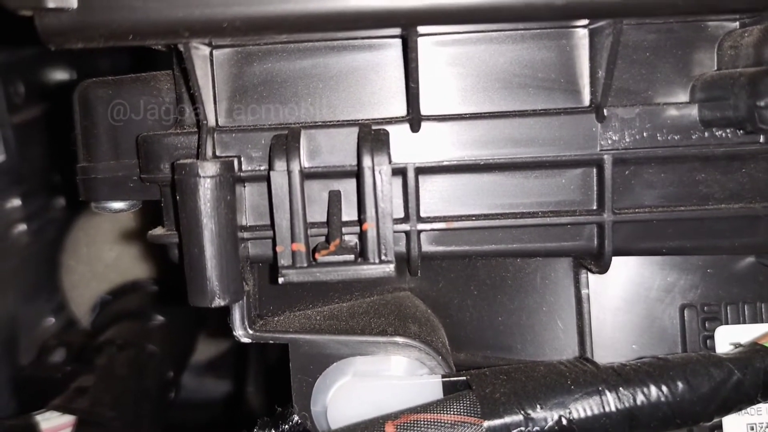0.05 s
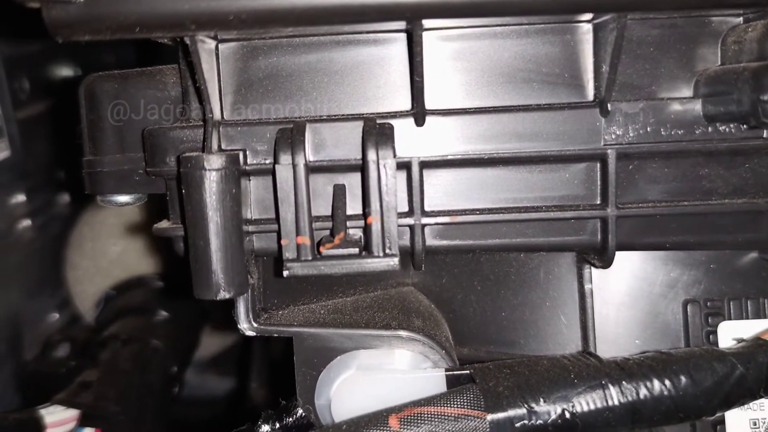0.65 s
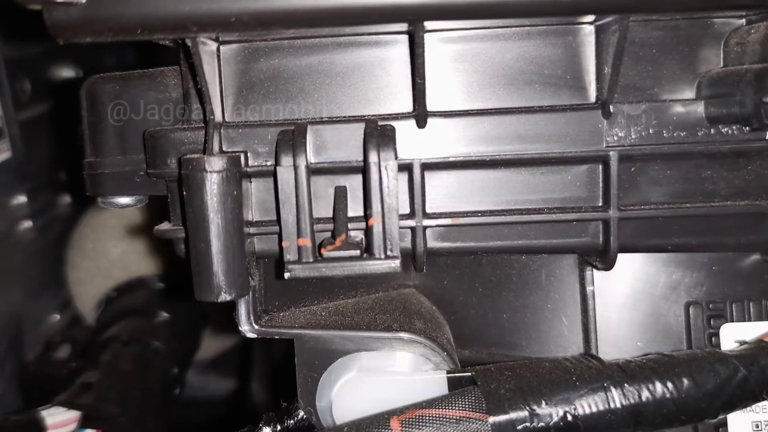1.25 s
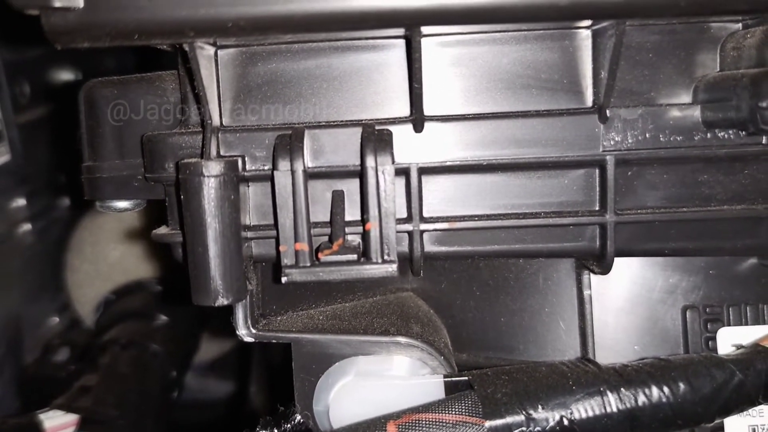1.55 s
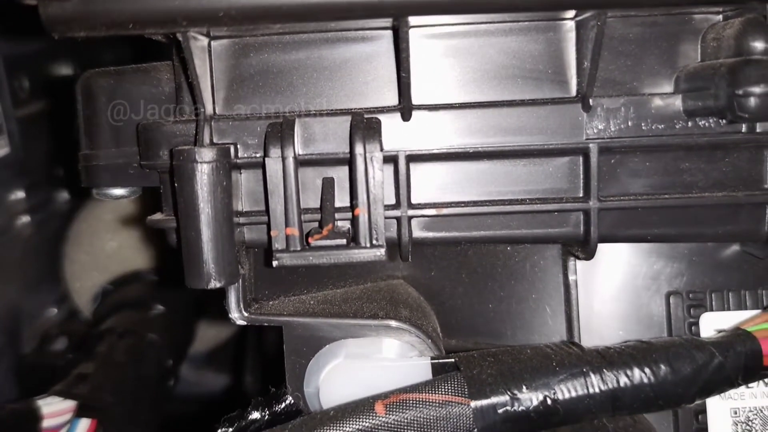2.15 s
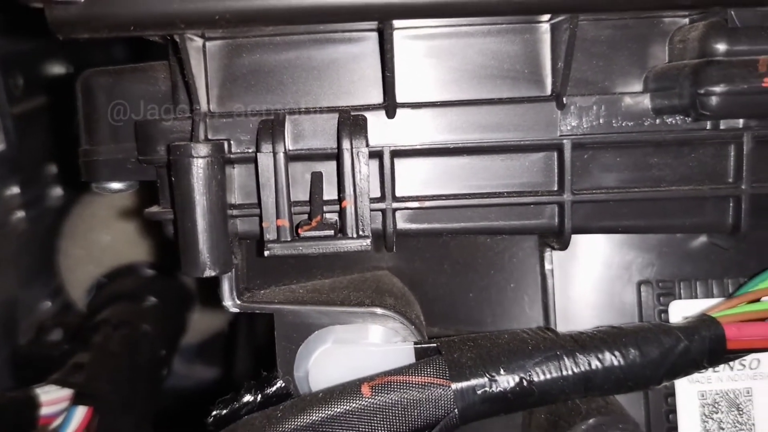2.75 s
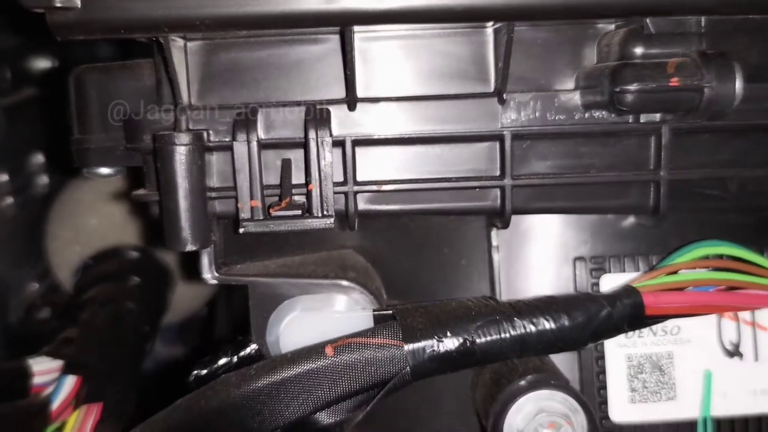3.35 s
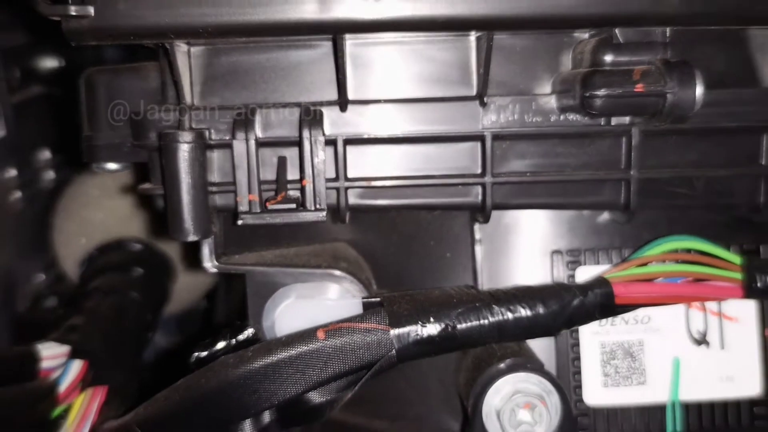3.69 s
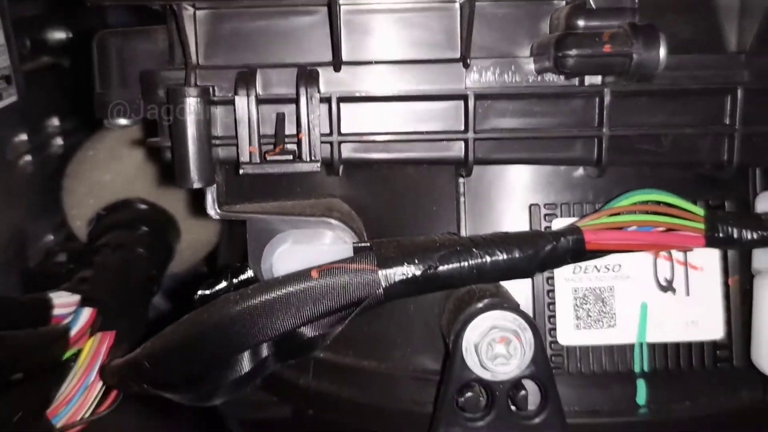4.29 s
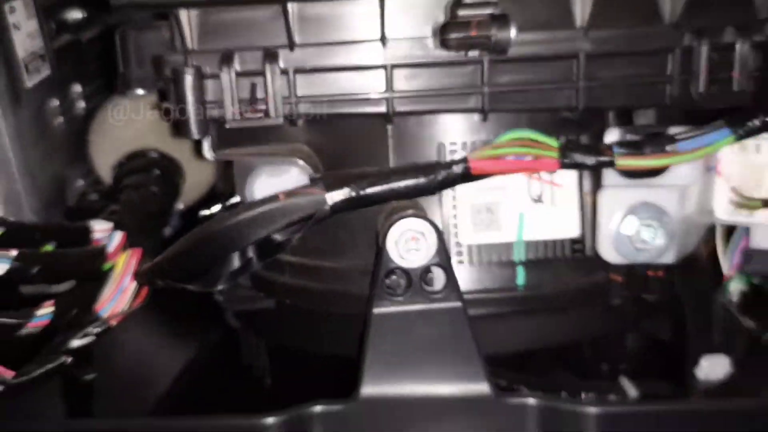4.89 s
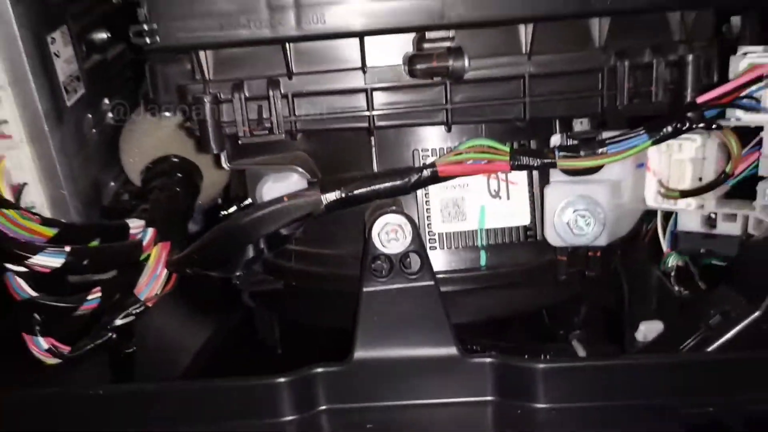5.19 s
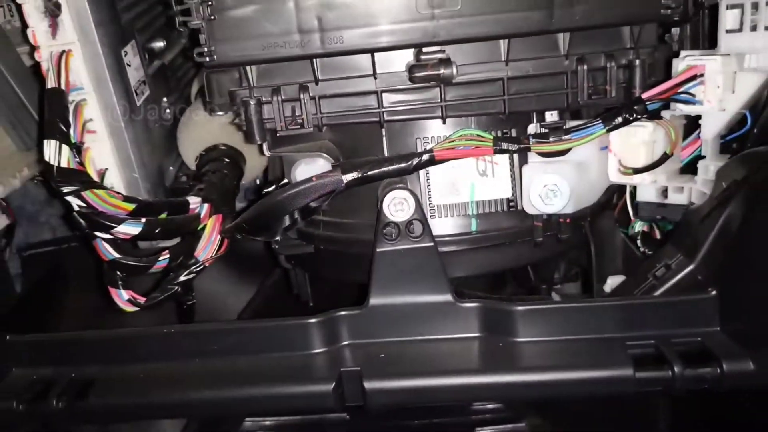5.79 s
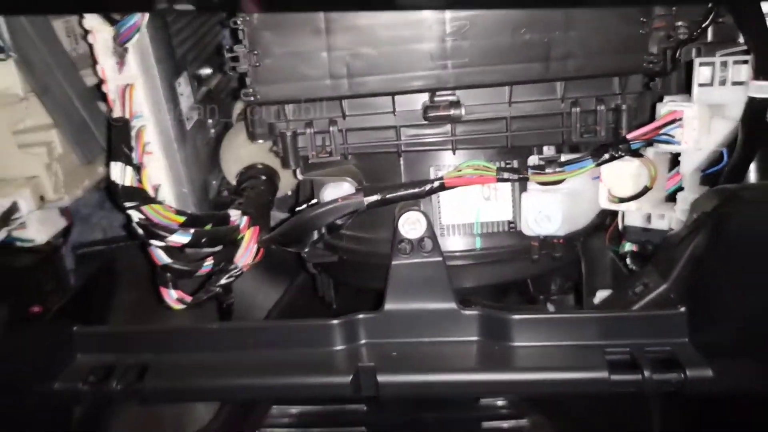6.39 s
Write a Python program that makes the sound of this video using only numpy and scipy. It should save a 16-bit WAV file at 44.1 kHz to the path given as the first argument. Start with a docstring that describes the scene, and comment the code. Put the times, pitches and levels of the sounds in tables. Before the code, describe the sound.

Inside a car, a small blower fan runs slowly behind the dashboard for the whole six and a half seconds. It makes a soft, steady whir of air through a plastic housing, with a thin, fluttering high hiss from its motor. Underneath, the idling engine gives a low, slightly throbbing hum. The hand-held microphone is close to the housing for the first three seconds, then gradually backs away, so the whir and hum become a little quieter. Around 3.8 seconds come two faint ticks, followed by a soft rub, two tiny plastic squeaks and another tick at about 4 seconds. A brief scuff of the hand passes at 4.7 seconds. At about 5.1 seconds there is one clear, sharp plastic click with a short rub just after it. The fan and engine then continue evenly to the end.

```python
"""A soft, steady whir of air with a thin, fluttering hiss, over the low hum of an idling car engine.
The heater fan runs slowly behind the open glove box, pushing air through its plastic housing.
The hiss comes from the brushes rubbing inside the fan's motor. The hand-held microphone starts
close to the housing, then backs away with a few rubs, faint squeaks and ticks, and one clear click."""
import sys
import numpy as np
from scipy import signal
from scipy.fft import rfft, irfft, next_fast_len
from scipy.io import wavfile
from scipy.ndimage import uniform_filter1d

SR = 44100
rng = np.random.default_rng(int(sys.argv[2]) if len(sys.argv) > 2 else 0)


def bounce(signal):
    """Save signal as a 16-bit WAV file at the path given by the first command-line argument."""
    frames = np.transpose(np.atleast_2d(signal))
    limited = np.clip(frames, -1, 1)
    pcm = np.round(limited * 32767).astype(np.int16)
    wavfile.write(sys.argv[1], SR, pcm)


N = 283991
T = np.arange(N) / SR
HZ = np.fft.rfftfreq(N, 1 / SR)
CRANK_HZ = 14.205  # turns of the engine's crankshaft per second

# the microphone's path: (time [s], distance [0 at the housing, 1 down by the feet])
MIC_DISTANCE = [(0, 0.039), (2.5, 0.0027), (3.6, 0.12), (4.4, 0.26), (5.0, .55), (5.5, 0.83), (6.44, 1)]


def fan(crank_turns):
    """Swirling air whirs and booms, throbbing as the engine shakes; turning parts add wavering tones."""
    # air rushing through the housing, close up and far away: (frequency [Hz], relative level [dB])
    rush_close = [(160, -25), (270, -5.5), (335, -3), (495, -1), (596, -2), (680, -10), (770, -10.5),
                  (890, -2.5), (1090, -15), (1250, -17.5), (1530, -15), (1850, -21.5), (2080, -33),
                  (3250, -60)]
    rush_far = [(160, -27.5), (270, 1.5), (360, 1), (440, -6), (580, 2), (750, -5.5), (980, -7),
                (1280, -14), (1440, -7), (1700, -25), (2050, -19), (2400, -43.5), (3250, -77)]
    # ringing of the housing: (frequency [Hz], width [Hz], level close [dB], level far [dB])
    housing_rings = [(515, 75, -50.5, -62), (848, 90, -54.5, -73.5), (1167, 23, -62.5, -64.5),
                     (1464, 110, -55, -63), (1752, 150, -61, -77.5), (2070, 110, -77, -67)]
    # boom of the air box and cabin: (frequency [Hz], relative level [dB])
    boom_spectrum = [(10, -24.5), (28, -13), (40, -22.5), (55, -11), (85, -0.5), (120, -1), (150, -3.5),
                     (180, -0.5), (230, -1.5), (290, -9), (400, -32.5), (700, -73.5)]
    # tones of the fan and other turning parts: (frequency [Hz], level close [dB], level far [dB])
    fan_tones = [(46.3, -56.5, -55), (49.6, -54.5, -56.5), (90, -48.5, -64.5), (118, -44, -60),
                 (181.1, -44, -49), (222.7, -50.5, -55.5), (230, -53, -50.5), (387.3, -61, -68.5),
                 (571.5, -60, -64), (784, -57.5, -61.5), (1160, -71.5, -66.5)]
    distance = curve(MIC_DISTANCE)
    rush = np.sqrt(1 - distance) * noise(colour(rush_close))
    rush += np.sqrt(distance) * noise(colour(rush_far))
    whir = patchy(rush * mic_gain(-40.5, -47) + ringing(housing_rings), depth_db=1.5)
    boom = noise(colour(boom_spectrum)) * mic_gain(-37, -42)
    throb = gain_of(0.42 * np.cos(2 * np.pi * crank_turns) + 0.5 * drift(7.3))
    tones = np.zeros(N)
    for hz, close_db, far_db in fan_tones:
        phase = 2 * np.pi * (hz * T + rng.random()) + 0.4 * drift(1.1)
        tones += mic_gain(close_db, far_db) * np.cos(phase)
    return (whir + boom) * throb + np.sqrt(2) * tones


def motor():
    """Brushes hiss on spinning contacts and ring the shell; a whine flutters as their touch varies."""
    # hiss of the brushes: (frequency [Hz], relative level [dB])
    hiss_spectrum = [(1500, -24), (2300, -2.5), (3000, -8.5), (3800, -7.5), (5100, -6.5), (5700, -11.5),
                     (6300, -11.5), (6900, -3.5), (7400, -7.5), (7800, -12), (8400, -11.5)]
    # ringing of the shell: (frequency [Hz], width [Hz], relative level close [dB], the same far [dB])
    shell_rings = [(3000, 70, -19, -25), (3265, 77, -19, -25), (5590, 150, -12.5, -15.5),
                   (6010, 120, -8, -10), (6273, 130, -3, -13), (6606, 96, -7.5, -8), (6750, 120, -20.5, -6),
                   (7090, 90, -13.5, -15.5), (7670, 100, -12.5, -24.5)]
    # whine of the motor: (frequency [Hz], width [Hz], level close [dB], level far [dB])
    whine_bands = [(4467, 37, -68.5, -77.5), (4630, 70, -73.5, -87)]
    brushes = noise(colour(hiss_spectrum)) * mic_gain(-2, -1.5)
    hiss = patchy(brushes + ringing(shell_rings), depth_db=3.3)
    flutter_hz = 18.2
    flutter_db = 3 * np.sin(2 * np.pi * flutter_hz * T + 0.5 * drift(2)) + 0.8 * drift(12)
    whine = dash_echo(ringing(whine_bands), share=0.33) * evened(gain_of(flutter_db))
    hiss = dash_echo(hiss, share=0.18) * mic_gain(-63, -65.5)
    # the hiss leaves the motor in a beam, which the microphone crosses at 3.2 s
    beam_db = 1.5 * np.exp(-((T - 3.2) / 0.79) ** 2)
    return hiss * gain_of(beam_db + 0.87 * drift(41)) + whine


def engine(crank_turns):
    """Two firings per turn push the cabin air into a hum; the valves' clatter repeats every two turns."""
    # tones of the hum: (frequency [multiple of the crank speed], level close [dB], level far [dB])
    hum_tones = [(1, -59.5, -66.5), (2, -47, -46.5), (3, -65, -64.5), (4, -36, -50.5), (5, -65, -63),
                 (6, -32, -41), (8, -45, -44.5), (10, -45.5, -49), (12, -46, -51), (14, -44.5, -50),
                 (16, -55, -58), (18, -57, -54.5), (20, -65.5, -53.5), (26, -55, -59.5)]
    # valve clatter through the cabin's front wall: (frequency [Hz], relative level [dB])
    clatter_spectrum = [(200, -35), (350, 9.5), (700, 0.5), (1000, -6.5), (1200, -6), (1550, -3),
                        (1800, -13), (2200, -43.5), (4000, -66.5)]
    cabin_hz, cabin_width_hz = 68, 18  # the cabin's own note; tones above it arrive later
    hum = np.zeros(N)
    for multiple, close_db, far_db in hum_tones:
        lag = 2 * np.arctan((multiple * CRANK_HZ - cabin_hz) / cabin_width_hz)
        hum += mic_gain(close_db, far_db) * np.cos(2 * np.pi * multiple * crank_turns - lag)
    size = 8192  # points in a loop of noise that lasts two turns
    loop_hz = np.arange(size // 2 + 1) * CRANK_HZ / 2
    loop = evened(irfft(colour(clatter_spectrum, loop_hz) * rfft(rng.standard_normal(size))))
    clatter = np.interp(crank_turns / 2 % 1 * size, np.arange(size), loop)
    clatter = evened(clatter * gain_of(2.5 * np.cos(2 * np.pi * crank_turns)))  # louder once a turn
    return np.sqrt(2) * (hum * gain_of(0.36 * drift(6)) + clatter * mic_gain(-53.5, -57))


def rubs():
    """Hand and sleeve rub in short swells of noise."""
    # each rub: (start [s], length [s], scuff level [dB], rasp level [dB], hiss level [dB])
    strokes = [(3.85, 0.32, -58, -67, -63.5), (4.695, 0.052, -45.5, -71, -59.5),
               (5.085, 0.13, -61, -66, -64.5), (5.123, 0.037, -45.5, -56, -65)]
    # the scuff, the rasp and the hiss: (frequency [Hz], width [Hz])
    bands = [(1100, 720), (2600, 1400), (6700, 1300)]
    out = np.zeros(N)
    for start, length, *levels_db in strokes:
        friction = sum(gain_of(db) * noise(peak(*band)) for db, band in zip(levels_db, bands))
        out += np.sqrt(swell(start, length)) * friction
    return out


def clicks():
    """Plastic snaps, rings briefly and gives the air a short push."""
    # each snap: (time [s], ring level [dB], snap level [dB], time to fade by 60 dB [s])
    snaps = [(3.756, -65, -56, .025), (3.811, -65, -56, .025), (4.125, -64, -60, .025),
             (5.073, -42, -52, .015), (5.0755, -32.5, -41, .012), (5.081, -44, -56, .035)]
    # ringing of the plastic: (frequency [Hz], width [Hz], relative level [dB])
    plastic_rings = [(1820, 300, -8), (2340, 240, -8), (2970, 280, -1), (3330, 280, 2), (4430, 600, -9),
                     (6300, 2000, -12)]
    plastic = sum(gain_of(db) * peak(hz, width) / np.sqrt(width) for hz, width, db in plastic_rings)
    push_above_ring_db, push_rise_s = 7, 0.0003
    out = np.zeros(N)
    for start, ring_db, snap_db, fade_s in snaps:
        ring = gain_of(ring_db) * noise(plastic)
        snap = gain_of(snap_db) * noise(peak(hz=6400, width_hz=3500))
        fade = (T >= start) * gain_of(-60 * np.clip((T - start) / fade_s, 0, 2))
        out += fade * (ring + snap)
        push_age = np.clip((T - start) / push_rise_s, 0, 20)
        out -= gain_of(ring_db + push_above_ring_db) * push_age * np.exp(1 - push_age)
    return out


def squeaks():
    """Plastic sticks and slips under the hand, making a wavering tone with a rasp around it."""
    # each squeak: (start [s], length [s], level [dB], pitch [Hz])
    slides = [(3.934, 0.08, -59, 2590), (4.02, .125, -61, 2590)]
    out = np.zeros(N)
    for start, length, db, hz in slides:
        slips = np.cumsum(hz + 35 * drift(80)) / SR
        loudness = gain_of(db + 2.5 * drift(90)) * swell(start, length) ** 0.3
        rasp = 0.4 * noise(peak(hz, width_hz=350))
        out += loudness * (np.sin(2 * np.pi * slips) + rasp)
    return out


def dash_echo(x, share):
    """Adds a bounce off the dashboard; its path changes as the hand sways and backs away."""
    delay_s = 0.001122 + 0.0005 * curve(MIC_DISTANCE) + 0.00003 * drift(1)
    return (x + share * np.interp(T - delay_s, T, x)) / np.sqrt(1 + share ** 2)


def mic_gain(close_db, far_db):
    """Volume that slides from its close level to its far level as the microphone backs away."""
    return gain_of(close_db + (far_db - close_db) * curve(MIC_DISTANCE))


def ringing(rings):
    """Random shaking keeps a part ringing at its own notes."""
    return sum(mic_gain(close, far) * noise(peak(hz, width)) for hz, width, close, far in rings)


def patchy(x, depth_db):
    """Makes narrow frequency bands of a sound swell and fade on their own."""
    spectra = signal.stft(x, nperseg=2048)[2]
    patches = uniform_filter1d(rng.standard_normal(spectra.shape), size=7, axis=0)  # smooth over pitch
    patches = evened(uniform_filter1d(patches, size=3, axis=1))  # and over time
    return signal.istft(spectra * evened(gain_of(depth_db * patches)), nperseg=2048)[1][:N]


def noise(shape):
    """Noise of strength 1; shape sets how much of each frequency it holds."""
    size = next_fast_len(N, True)
    gains = np.interp(np.fft.rfftfreq(size, 1 / SR), HZ, shape)
    spectrum = rng.standard_normal(len(gains)) + 1j * rng.standard_normal(len(gains))
    return evened(irfft(gains * spectrum, size)[:N])


def drift(rate_hz):
    """A random wobble of strength 1, up to about the given rate."""
    return noise(1 / (1 + (HZ / rate_hz) ** 4))


def colour(points, hz=HZ):
    """Joins (frequency, level) points into a gain for every frequency."""
    points_hz, db = np.transpose(points)
    return gain_of(np.interp(np.log(hz + 1), np.log(points_hz + 1), db))


def peak(hz, width_hz):
    """A hump of gain around one frequency."""
    return 1 / (1 + ((HZ - hz) / width_hz * 1.3) ** 2)


def swell(start, length):
    """A rise from 0 to 1 and back."""
    return np.abs(np.sin(np.pi * np.clip((T - start) / length, 0, 1)))


def curve(points):
    """Joins (time, value) points into a value for every sample."""
    return np.interp(T, *np.transpose(points))


def gain_of(db):
    """Turns decibels into a gain: the number to multiply a sound by."""
    return 10 ** (np.asarray(db) / 20)


def evened(x):
    """Scales a signal to an average strength (rms) of 1."""
    return x / np.sqrt(np.mean(x ** 2) + 1e-20)


def low_pass(x, hz):
    """Cuts away the treble above hz."""
    return signal.oaconvolve(x, signal.firwin(255, hz, window=("kaiser", 8), fs=SR)[None], "same")


def scene():
    """Engine, fan, motor and hand sounds add up at one microphone."""
    crank_turns = np.cumsum(CRANK_HZ * (1 + 0.00087 * drift(1.75))) / SR  # the idle wanders slightly
    return (engine(crank_turns) + fan(crank_turns) + motor() + rubs() + clicks() + squeaks())[None]


def record(dry):
    """The microphone loses the highest treble, and its electronics add a faint hiss."""
    faint_hiss = gain_of(-85) * rng.standard_normal(N)
    return low_pass(low_pass(dry, hz=8200) + faint_hiss, hz=15500)


dry = scene()
out = record(dry)
bounce(out)
```